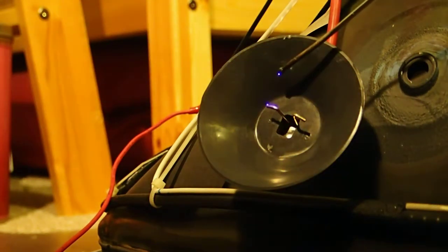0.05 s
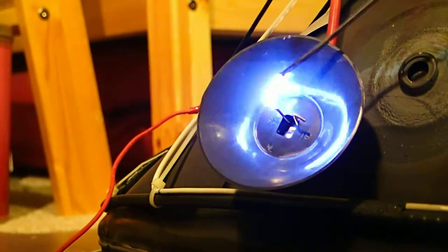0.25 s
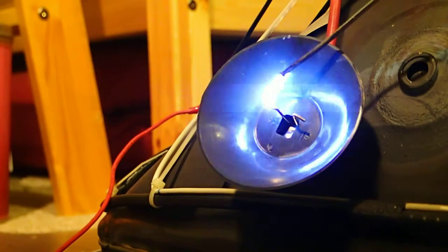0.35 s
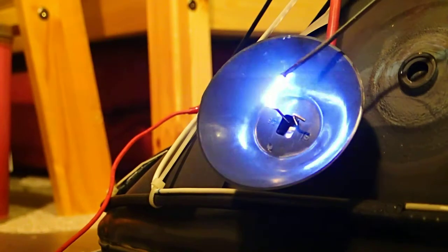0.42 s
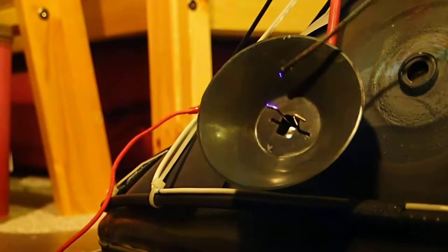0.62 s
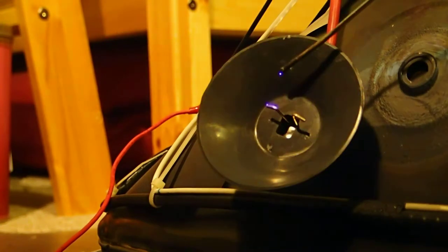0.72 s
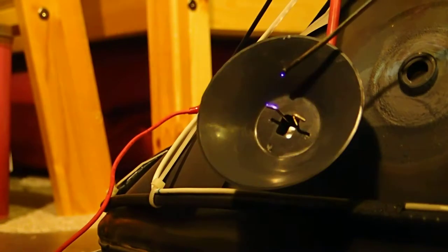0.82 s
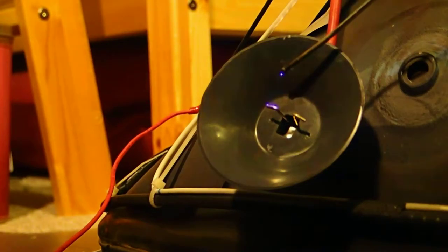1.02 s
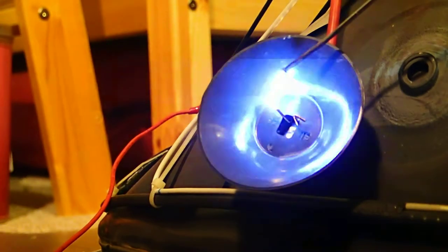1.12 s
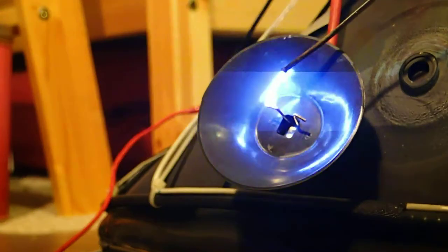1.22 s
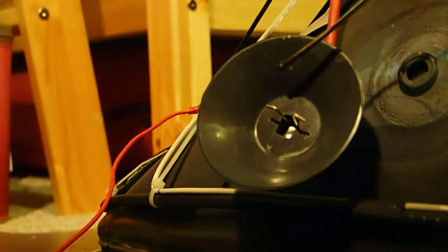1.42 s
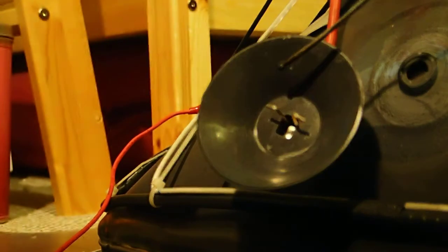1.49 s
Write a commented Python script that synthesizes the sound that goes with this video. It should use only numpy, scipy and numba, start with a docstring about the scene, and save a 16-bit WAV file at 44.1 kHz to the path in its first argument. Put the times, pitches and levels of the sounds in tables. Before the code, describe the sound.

Electric arcs crackle in two harsh bursts over a faint hiss, then a switch clicks.

```python
"""Sparks jump from a high-voltage lead to a picture tube, in single snaps and rattling volleys.
Each spark makes a sharp crack in the small room and a low thump in the overloaded microphones.
Charge leaking from the tip (a corona) fizzes thinly until a switch clicks. A fan hums behind.
The sparks overload two ringing microphone ports (the openings the sound goes in by); the gain
control turns everything down at once, then slowly lets the background back in."""
import sys
import numpy as np
from scipy import signal
from scipy.fft import rfft, irfft
from scipy.io import wavfile
from numba import njit

SR = 44100
rng = np.random.default_rng(int(sys.argv[2]) if len(sys.argv) > 2 else 0)


def to_wav(sig):
    """Store sig (one row per channel, or 1-D mono) as 16-bit WAV at the path in sys.argv[1].

    Samples outside -1..1 are clipped; the rate is SR.
    """
    pcm = np.clip(np.atleast_2d(sig), -1, 1) * 32767
    pcm = np.round(pcm).astype(np.int16)
    wavfile.write(sys.argv[1], SR, pcm.T)  # frames by channels


N = 68355
TIME = np.arange(N) / SR

# The fan's rush of air. Each row: frequency in Hz, relative level in dB.
FAN_SPECTRUM = [(25, -16), (50, -4), (90, -5.5), (150, 3), (210, -8), (370, -1), (650, -9), (1100, -9),
                (1700, -13.5), (4000, -19), (15000, -30)]
# The fan's hum. Each row: pitch in Hz, level in dB.
FAN_HUM = [(129, -59), (162, -50), (1012, -56), (1572, -63.5)]
# How the switch body rings. Each row: pitch in Hz, width in Hz, boost in dB.
SWITCH_RINGS = [(520, 100, 21.5), (2630, 140, 12.5), (5320, 300, 3.5), (9800, 500, 5), (11160, 710, 7),
                (12300, 900, 7)]
# The fizz over time. Each row: time in seconds, pulses per second, dB added to CORONA_DB.
CORONA_CURVE = [(0, 610, -1.5), (.2, 590, 0.5), (.7, 1060, -3), (.77, 1020, -2), (.85, 640, -2),
                (.99, 700, 12), (1.1, 700, -4), (1.4, 620, -4)]
# Brief flares of the fizz. Each row: start in seconds, level in dB.
CORONA_FLARES = [(.797, -39), (0.814, -34), (0.837, -37.5)]
# The room's echoes. Each row: delay in seconds, energy in dB, seconds to fade by 60 dB.
ECHOES = [(.0021, -8.5, 0.004), (.0048, -6, 0.016), (.008, -10, 0.19)]
# The tone of each microphone port, and a dip they share below their ringing.
# Each row: frequency in Hz, width in Hz, boost (or dip) in dB.
LEFT_PORT_TONE = [(4050, 1500, -2.5), (6115, 670, 14), (7660, 780, 5.5), (12180, 1840, 10)]
RIGHT_PORT_TONE = [(3900, 2200, -2.5), (5488, 540, 20.5), (7580, 1230, 3), (12790, 1770, 10.5)]
PORT_DIP = [(4100, 550, -5.5)]
# Runs of evenly spaced sparks. Each row: first and last time in seconds, number of sparks,
# relative spark level in dB, relative thump level in dB.
SPARK_VOLLEYS = [ (.2027, .2027, 1, 4.5, -8), (0.215, .2187, 2, 2.5, 3), (0.2262, .2308, 2, -2, -2.5),
                 (0.238, .2370, 1, -6, 2), (.2489, .2697, 3, -0.5, 2), (.2788, .2825, 2, -1, -13),
                 (0.2927, .2970, 2, 1, -8), (0.3068, .3113, 2, 1.5, -18), (0.3207, .3293, 3, -0.5, -2),
                 (0.3385, .3502, 4, 0, -4), (0.36, .3721, 4, -0.5, -5), (.3800, .3840, 2, 0.5, -4),
                 (0.3927, .4021, 2, 3, -3.5), (0.409, .4594, 7, 2.5, -6), (.4686, .4861, 3, 3.5, -2.5),
                 (0.4938, .5022, 3, 2, -20), (0.5116, .5154, 2, 2, -11), (0.5235, .5324, 2, 4, 0),
                 (0.5427, .5615, 3, 2, 2.5), (.8587, .8587, 1, 3, -2), (0.8948, .8947, 1, 4.5, -6),
                 (1.0194, 1.0194, 1, 3.5, -9), (1.0424, 1.0427, 1, 8, 5), (1.0620, 1.0620, 1, 0.5, 8),
                 (1.0796, 1.0793, 1, 7, -15), (1.093, 1.1043, 3, 1.5, 1.5), (1.1064, 1.1383, 10, -1.5, 7),
                 (1.1408, 1.1587, 7, -2, 0), (1.163, 1.1833, 4, 2, -8), (1.2048, 1.2051, 1, 6, -3),
                 (1.2131, 1.2660, 9, 1.5, 2.5), (1.2713, 1.2793, 3, 0.5, 6), (1.2825, 1.2916, 5, 0, 0.5)]

FAN_DB, FAN_SIDE_DB = -45, -7.5
SWITCH_S, SWITCH_DB, SWITCH_FADE_S = 1.4335, -17, 0.051
CORONA_DB, CORONA_SCATTER_DB, CORONA_JITTER, FLARE_FADE_S = -23.5, 0.5, 0.19, 0.031
SPARK_DB, SPARK_SCATTER_DB, SPARK_JITTER_S = 22.5, 0.52, 0.0001
SIZZLE_DB, SIZZLE_FADE_S = -16, 0.0015
PULSE_S, PULSE_DB, THUMP_DB = (0.00021, 0.00046), (6, 9.5), (9, 5)  # each pair is left, right
THUMP_HZ, THUMP_WIDTH_HZ = 109, 180
LEFT_PORT_DB, OVERLOAD_DB = -1.5, 16.5
LIMIT_DB, ATTACK_S, HOLD_S, RELEASE_DB_PER_S = -7, 0.00052, 0.072, 112.5


def from_db(db):
    """Turns decibels into a gain to multiply by."""
    return 10 ** (np.asarray(db) / 20)


def keep_band(x, hz, kind, order=2):
    """Keeps what lies below hz ("low") or above it ("high")."""
    return signal.sosfilt(signal.butter(order, hz, kind, fs=SR, output="sos"), x + 1e-18)


def resonate(x, rows):
    """Boosts or dips one band per row; a narrow boost rings."""
    for hz, width_hz, db in rows:
        damp = np.pi * width_hz / SR
        tuning = -2 * np.cos(2 * np.pi * hz / SR)
        lift = damp * from_db(db)
        x = signal.lfilter([1 + lift, tuning, 1 - lift], [1 + damp, tuning, 1 - damp], x + 1e-18)
    return x


def clicks(times, gains):
    """A one-sample click at each time."""
    return np.bincount(np.maximum(times * SR, 0).astype(int), gains, N)[:N]


def dying_noise(start, fade_s):
    """Hiss that starts suddenly and falls 60 dB in fade_s seconds."""
    age = np.maximum(TIME - start, 0)
    return rng.standard_normal(N) * (TIME >= start) * from_db(-60 * age / fade_s)


def fan():
    """A steady rush of air with a few humming tones."""
    hz, db = np.transpose(FAN_SPECTRUM)
    colour = from_db(np.interp(np.log(np.fft.rfftfreq(N, 1 / SR) + 1), np.log(hz), db))
    mid, side = irfft(rfft(rng.standard_normal((2, N))) * colour, N)
    # Side is added on the left and taken away on the right, for width.
    rush = from_db(FAN_DB) * (mid + from_db(FAN_SIDE_DB) * side * [[1], [-1]]) / mid.std()
    return rush + sum(from_db(db) * np.sqrt(2) * np.sin(2 * np.pi * (hz * TIME + rng.random()))
                      for hz, db in FAN_HUM)


def room(x):
    """Adds two close echoes and a short tail, partly alike on both sides."""
    echo = 0
    for delay, db, fade_s in ECHOES:
        mid, side = dying_noise(delay, fade_s), dying_noise(delay, fade_s)
        pair = mid + from_db(-3) * side * [[1], [-1]]
        echo = echo + from_db(db) * pair / np.linalg.norm(pair, axis=1, keepdims=True)
    return x + signal.fftconvolve(x[None], echo, axes=1)[:, :N]


def switch():
    """A short clack further off: a knock rings the switch body."""
    knock = keep_band(dying_noise(SWITCH_S, SWITCH_FADE_S), hz=9100, kind="low", order=1)
    return from_db(SWITCH_DB) * resonate(knock, SWITCH_RINGS)


def corona():
    """Tiny, nearly regular discharges fizz and sometimes flare, until the switch opens."""
    curve_s, rate, curve_db = np.transpose(CORONA_CURVE)
    pulses_so_far = np.cumsum(np.interp(TIME, curve_s, rate)) / SR
    uneven_counts = np.cumsum(1 + CORONA_JITTER * rng.standard_normal(2000))
    times = np.interp(uneven_counts, pulses_so_far, TIME)
    scatter_db = CORONA_SCATTER_DB * rng.standard_normal(len(times))
    gains = from_db(CORONA_DB + np.interp(times, curve_s, curve_db) - scatter_db)
    fizz = clicks(times, gains * (times < SWITCH_S))
    flares = sum(from_db(db) * dying_noise(start, FLARE_FADE_S) for start, db in CORONA_FLARES)
    return keep_band(fizz + flares, hz=11400, kind="low", order=1)


def spark_events():
    """Spreads each volley into slightly uneven sparks: times, gains and thump gains."""
    sparks = [(time, db, thump_db) for first, last, count, db, thump_db in SPARK_VOLLEYS
              for time in np.linspace(first, last, count)]
    times, db, thump_db = np.transpose(sparks)
    jitter, scatter = rng.standard_normal((len(times), 2)).T
    return times + SPARK_JITTER_S * jitter, from_db(db + SPARK_SCATTER_DB * scatter), from_db(thump_db)


def spark_thumps(times, gains, thump_gains):
    """Each spark overloads the microphones with a one-sided pulse; electrical pickup adds a thump."""
    decay = np.exp(-np.pi * THUMP_WIDTH_HZ / SR)
    resonance = [1, -2 * decay * np.cos(2 * np.pi * THUMP_HZ / SR), decay * decay]
    channels = []
    for pulse_s, pulse_db, thump_db in zip(PULSE_S, PULSE_DB, THUMP_DB):
        shape = np.clip(pulse_s * SR - np.arange(SR // 500), 0, 1)
        pulse = -from_db(pulse_db) * signal.lfilter(shape, [1], clicks(times, gains))
        pulse = keep_band(keep_band(pulse, hz=139, kind="high"), hz=2920, kind="low")
        kicks = clicks(times, thump_gains * rng.choice([-1, 1], len(times)))
        pickup = signal.lfilter([1, -1], resonance, kicks + 1e-18)
        thump = keep_band(keep_band(pickup, hz=54, kind="high"), hz=440, kind="low", order=1)
        channels.append(pulse + from_db(thump_db) * thump)
    return np.array(channels)


def spark_cracks(times, gains):
    """Each spark is a sharp click; its ragged channel smears it into a very short sizzle."""
    hits = clicks(times, gains)
    tails = signal.lfilter([1], [1, -from_db(-60 / (SIZZLE_FADE_S * SR))], hits + 1e-18)
    sizzle = from_db(SIZZLE_DB) * tails * rng.standard_normal(N)
    return from_db(SPARK_DB) * (hits + sizzle)


def microphone_ports(x):
    """Each port rings at its own pitch and overloads on the sparks."""
    left = from_db(LEFT_PORT_DB) * resonate(x[0], LEFT_PORT_TONE)
    right = resonate(x[1], RIGHT_PORT_TONE)
    ceiling = from_db(OVERLOAD_DB)
    squashed = ceiling * np.tanh(np.array([left, right]) / ceiling)
    return resonate(squashed, PORT_DIP)


@njit
def gain_control(excess_db):
    """How many dB to turn down: chases any excess, holds, then lets go at a steady rate."""
    duck_db = np.zeros(len(excess_db))
    now_db, wait = 0., 0.
    for i, excess in enumerate(excess_db):
        if excess > now_db:
            now_db += (excess - now_db) / (ATTACK_S * SR)
        if excess > now_db - 3:  # a peak within 3 dB restarts the hold
            wait = HOLD_S * SR
        wait -= 1
        if wait < 0:
            now_db = max(now_db - RELEASE_DB_PER_S / SR, 0.)
        duck_db[i] = now_db
    return duck_db


def scene():
    """Sparks, corona and switch in the room, over the fan."""
    times, gains, thump_gains = spark_events()
    # The arc wanders between two paths that echo differently.
    path = rng.integers(0, 2, len(times))
    cracks = sum(room(spark_cracks(times, gains * (path == k))) for k in range(2))
    air = cracks + room(corona() + switch())
    treble = keep_band(keep_band(air, hz=2800, kind="high"), hz=13340, kind="low", order=3)
    return microphone_ports(treble) + spark_thumps(times, gains, thump_gains) + fan()


def record(dry):
    """Turns loud moments down, clips the snaps that slip through and cuts the highest treble."""
    excess_db = 20 * np.log10(np.abs(dry).max(axis=0) + 1e-9) - LIMIT_DB
    clipped = np.clip(dry * from_db(-gain_control(excess_db)), -.9, .9)
    top_cut = signal.cheby2(20, 60, 16300, fs=SR, output="sos")  # 60 dB down from 16300 Hz up
    return signal.sosfilt(top_cut, clipped)


dry = scene()
out = record(dry)
to_wav(out)
```